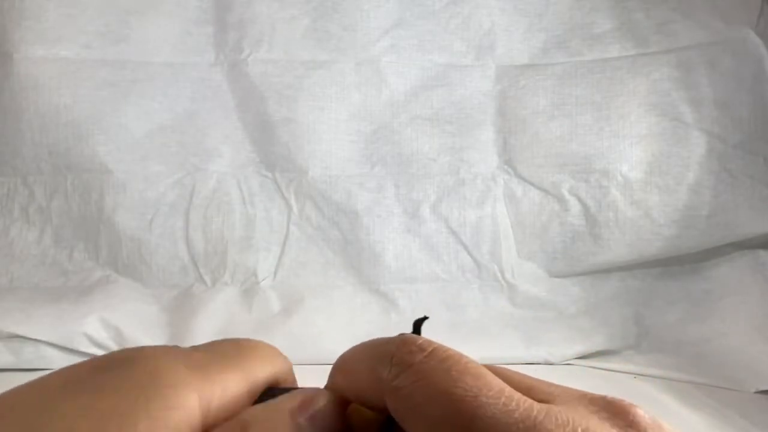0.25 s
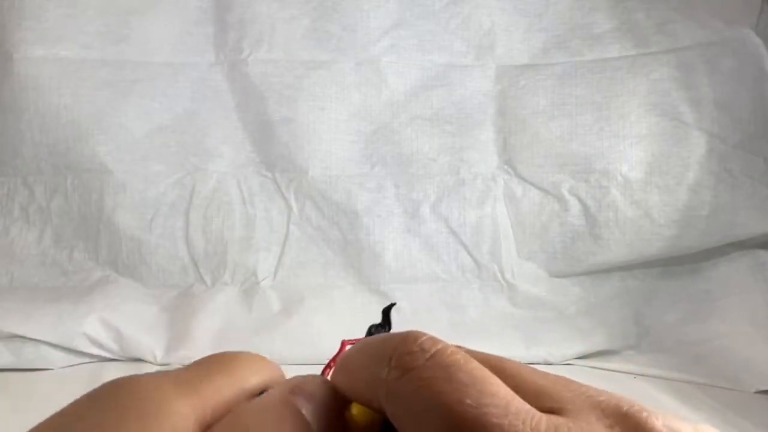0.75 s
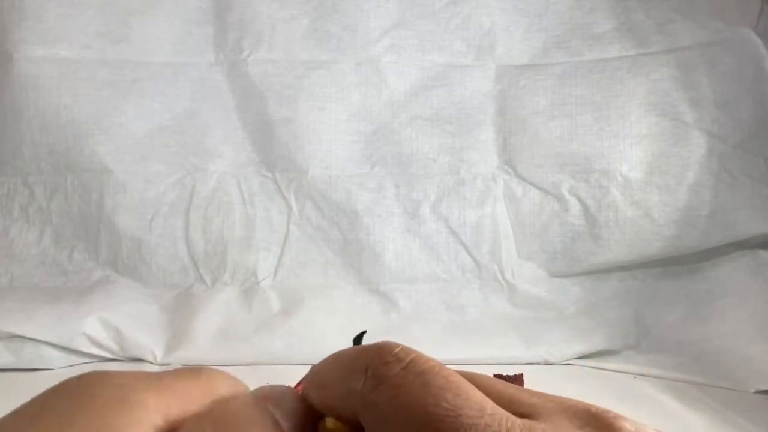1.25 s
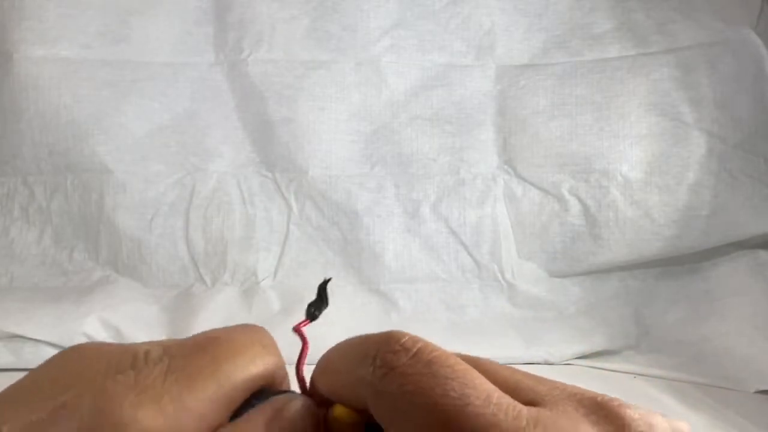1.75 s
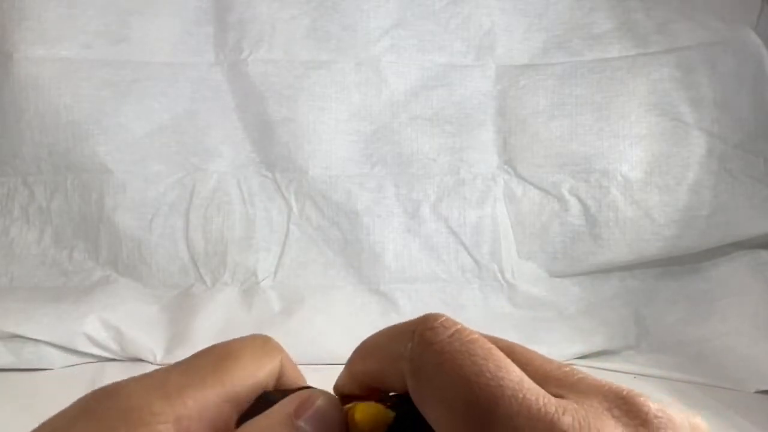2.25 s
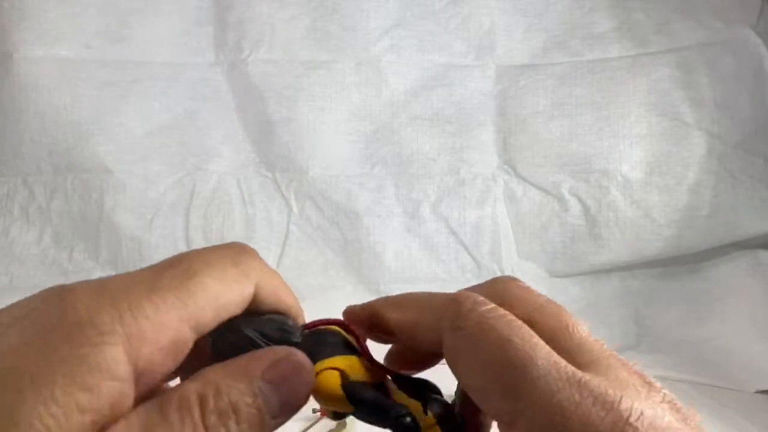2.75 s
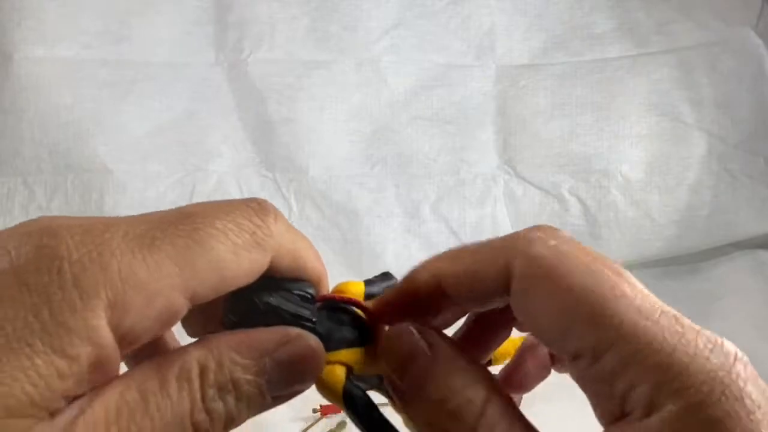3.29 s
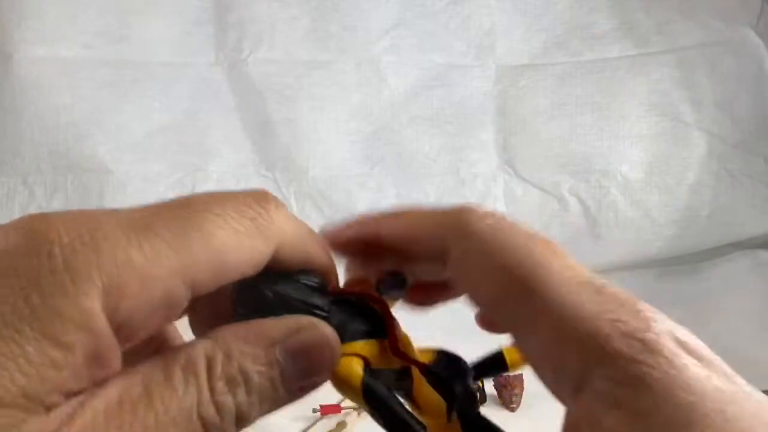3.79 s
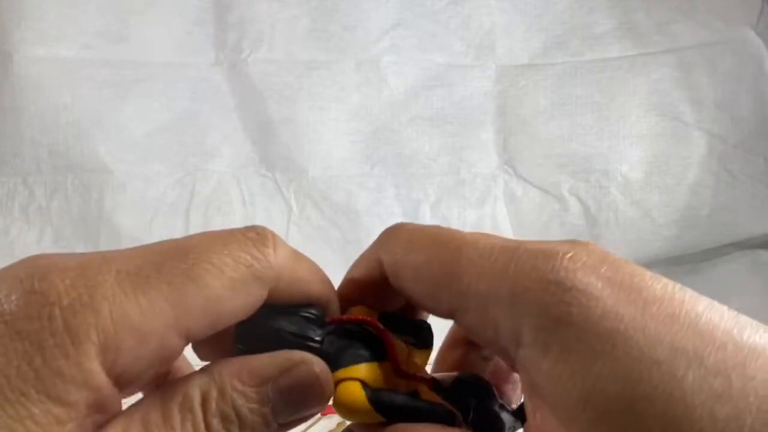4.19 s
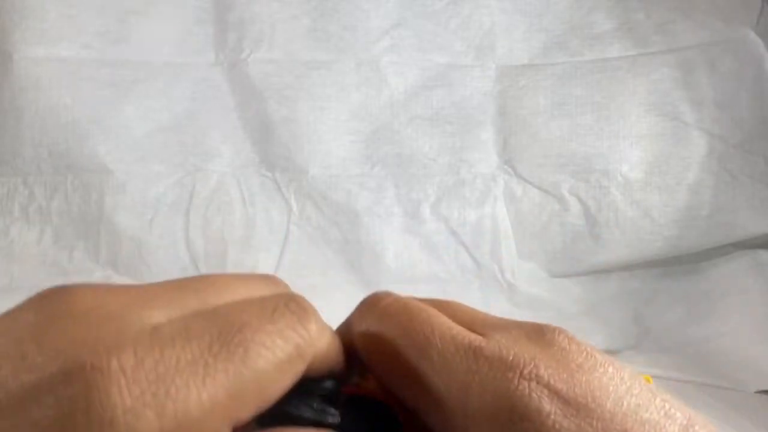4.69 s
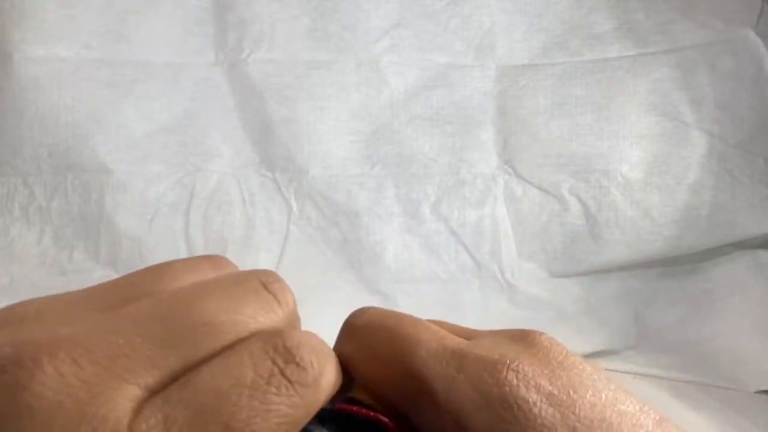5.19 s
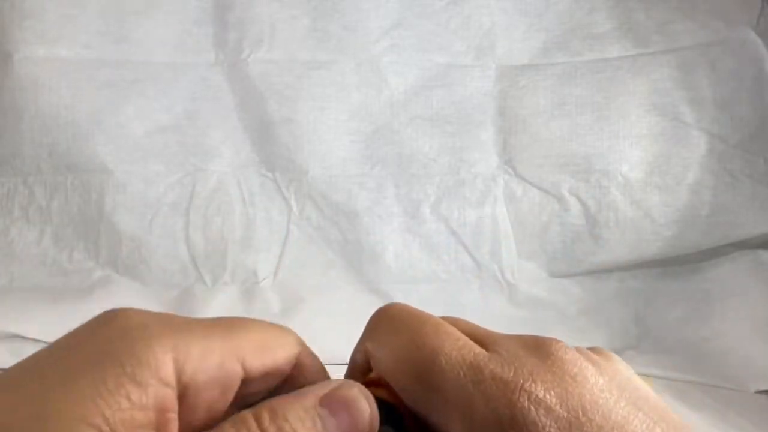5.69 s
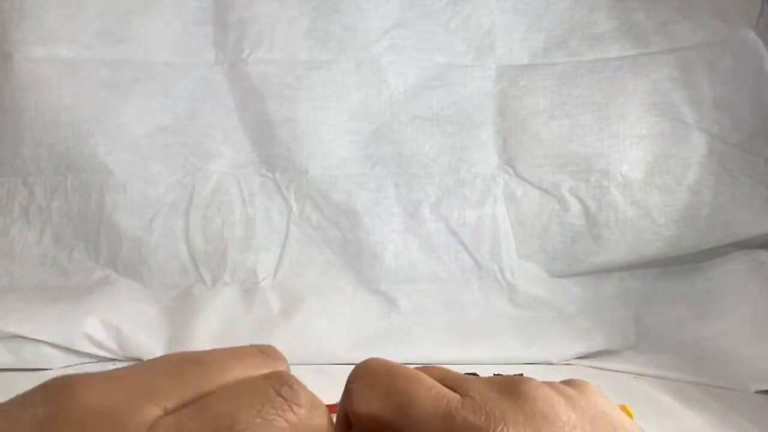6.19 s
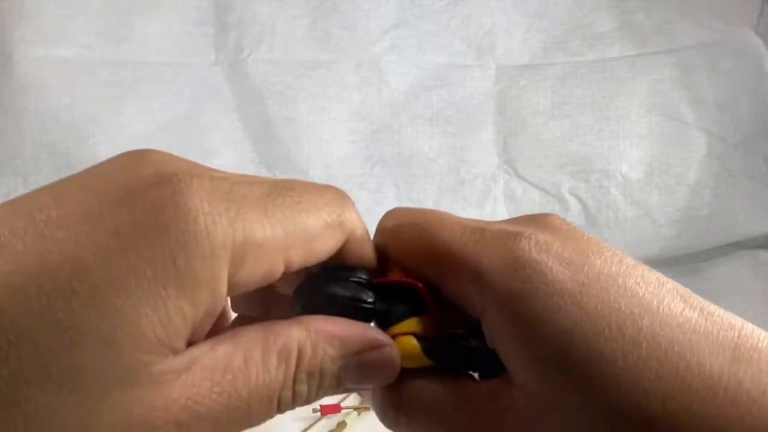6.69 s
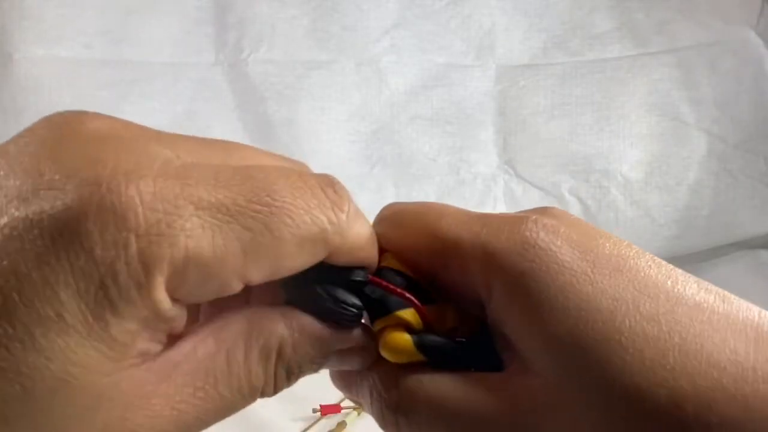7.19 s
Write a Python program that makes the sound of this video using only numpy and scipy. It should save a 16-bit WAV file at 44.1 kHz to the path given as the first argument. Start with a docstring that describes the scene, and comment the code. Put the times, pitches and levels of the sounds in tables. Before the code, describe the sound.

Crisp plastic snaps and faint creaking ticks from a toy figure's stiff joint, with soft skin rubs and a few dull knocks, over faint hiss.

```python
"""In a small soft room, two hands work a stiff joint of a plastic toy figure close to a microphone.
The joint snaps and ticks, each slip ringing the modes of the plastic; fingers rub and scrape over it,
their fine random slips driving the same kind of modes, heavily damped or singing in one part.
A low handling bump and a few duller knocks farther off ring a second set of modes.
Underneath lie steady air noise, a low rumble that swells and fades, and a faint hum."""
import sys
import numpy as np
from scipy import signal
from scipy.io import wavfile
from scipy.ndimage import uniform_filter1d

SR = 44100
rng = np.random.default_rng(int(sys.argv[2]) if len(sys.argv) > 2 else 0)


def file_out(sig):
    """Save sig as 16-bit WAV at sys.argv[1]."""
    # one column per channel
    cols = np.atleast_2d(sig).T
    # limit, then scale
    lim = np.clip(cols, -1, 1)
    pcm = np.round(lim * 32767).astype(np.int16)
    wavfile.write(sys.argv[1], SR, pcm)


N = 328545  # samples

# All levels stand ahead of the peak rounding and bass cut in record(); t60 is the time to decay by 60 dB.

# Shape of the air noise spectrum. Each row: frequency in Hz, relative level in dB.
AIR_SPECTRUM = [(18, -34.5), (30, -11), (70, 2), (118, 5.5), (298, 2.5), (1310, -8.5), (4900, -18),
                (6900, -18.5), (9230, -18), (14800, -24.5), (16500, -44)]
AIR_DB = -69.5  # rms
# Low rumble that swells and fades. Each row: time in seconds, rms level in dB.
MURMUR_LEVELS = [(0.0, -76), (4.941, -74.5), (6.02, -67.5), (6.47, -79.5), (7.45, -79.5)]
MURMUR_HZ, MURMUR_WIDTH_HZ = 332, 162
# Hum that comes and goes. Each row: time in seconds, rms level in dB.
HUM_LEVELS = [(0, -76), (2.4, -77.5), (2.55, -87.5), (2.75, -77), (3.4, -75), (3.6, -81.5), (5.2, -86.5),
              (5.8, -82.5), (7.2, -80.5), (7.45, -88)]
HUM_HZ = 58.5

# Modes of the figure in five groups, low to high. Each row: frequency in Hz, t60 in seconds of the
# freely ringing figure, relative level in dB.
THUMP_MODES = [(90, 0.039, -13), (169, 0.051, -17), (413, 0.019, -13), (693, 0.0067, 6), (998, 0.0053, 8)]
DULL_MODES = [(1970, 0.0029, -2.5), (2380, 0.0067, -7), (3100, 0.0055, -3), (3864, 0.0029, 6)]
HARD_MODES = [(4823, 0.0035, -0.5), (5775, 0.004, -0.6), (6870, 0.0025, -3)]
BRIGHT_MODES = [(8030, 0.0048, 0.028), (9000, 0.0049, 0.005), (9794, 0.0055, 0.016), (10440, .004, 0.016)]
TOP_MODES = [(11700, .003, 1), (12900, .003, 1), (14200, .003, 0), (15500, .003, -1)]
TOP_DB = -1  # top modes against the treble, in snaps

# Resting grip of the fingers. Each row: time in seconds, level of the hard modes in dB.
GRIP_LEVELS = [(0, -130), (.5, -88), (.6, -86), (1.1, -80.5), (1.65, -83), (2.0, -83), (2.6, -83.5),
               (3.65, -81), (4.1, -85.5), (4.7, -79), (5.17, -84.5), (5.5, -76.5), (6.06, -82), (6.7, -87),
               (7.0, -79.5), (7.3, -85), (7.45, -81.5)]
GRIP_DULL_DB, GRIP_BRIGHT_DB = 2, -1.2  # against the hard modes
# Finger strokes over the plastic. Each row: middle in seconds, half length in seconds, level of the
# hard modes at the middle in dB, then against it: duller modes in dB, brighter modes in dB.
FINGER_STROKES = [(0.106, 0.29, -69, 7, -1), (0.364, 0.064, -75, 8, -9), (0.878, 0.33, -71, 2.5, -1.5),
                  (1.204, 0.28, -71.5, 4, -6), (1.71, .03, -75, -3.5, -7), (1.803, 0.08, -75.5, 3, -1),
                  (2.24, 0.14, -75, -4.5, 0.5), (2.463, 0.11, -66.5, -10.5, -1.5),
                  (2.562, 0.071, -67, -10.5, -1), (2.694, 0.094, -68.5, -4, -6.5), (2.76, .04, -73, 4, 3),
                  (2.92, 0.099, -78, -3.5, 2.5), (2.813, 0.024, -66.5, 3.5, -3), (3.02, 0.026, -65, -4, -5),
                  (3.141, 0.047, -67.5, -4, -0.5), (3.249, 0.029, -62.5, -12.5, -1.5),
                  (3.375, 0.11, -68, -2, -4), (3.486, 0.03, -64.5, -4, 1), (3.582, 0.062, -72.5, -6, 1),
                  (3.8, 0.082, -69, -1, 1.5), (3.957, 0.17, -69.5, -1, 2), (4.071, 0.024, -64.5, -2, 0),
                  (4.235, 0.058, -64.5, -4.5, 0.5), (4.374, 0.047, -61, -6, -7),
                  (4.46, 0.094, -62, -5.5, -0.5), (4.63, 0.049, -76, -6, -7), (4.877, 0.1, -71, 1.5, -0.5),
                  (5.02, 0.11, -69.5, -14, -4), (5.289, 0.098, -73.5, 7, -2.7),
                  (5.497, .09, -72.5, -6, -10), (5.66, 0.076, -77, 1.5, -7.5),
                  (7.17, 0.1, -78, -11.5, -8.5), (5.868, 0.089, -67.5, -12, 1), (6.25, .14, -72, 1, 1.5),
                  (6.423, 0.076, -77, -6, -4.5), (6.833, 0.075, -75, -7, -6.5)]
STROKE_FALL_DB = 16  # how far a stroke has faded half a length from its middle
SLIPS_PER_S, SLIP_SPREAD_DB = 14000, 3  # mean rate, scale of the exponential spread

# Snaps of the joint. Each row: start in seconds, peak in dB, pitch in Hz of the part that lets go, then
# against that part: thump, dull, hard and treble modes in dB; last, the room in dB before ROOM_DB is
# added, less when the hands cup the figure.
JOINT_SNAPS = [(0.042, -38.5, 2740, -19, -10, -6, -20, 7),
               (0.0994, -14.5, 5540, -22.5, -6.5, -4.5, -11, -2),
               (0.1377, -13.5, 5540, -23, -8, -7, -13, -2.5), (0.1563, -17.5, 2660, -36, -11, -3, 2, -6),
               (0.2309, -31.5, 3650, -21, 1, -11, 5.5, -3), (0.2498, -42.5, 3660, -15, -3, -2.5, -11, 5),
               (0.2689, -38.5, 3750, -7.5, -11, -3, -16, -6), (0.3277, -26, 3720, -33, 5.5, 8, 5.5, -1),
               (0.341, -32, 3850, -22, -3, -1, -19, -13), (0.3498, -38, 3810, -20, 2, -1.5, -26, 6),
               (0.3765, -32, 4080, -28, 4, 0, -3, -9), (0.3876, -32, 6650, -41, -12, -12, -17, 0),
               (0.3937, -28, 3350, -39, -1, -3, -8, -4), (0.436, -40, 6460, -8, 0, -9, -11, 0),
               (0.4432, -14.5, 7000, -49, -1, 4.5, 1, -9), (0.447, -19, 6200, -49, -11, -4, -10.5, 0),
               (0.4601, -29.5, 4150, -26, 5, 1, -3, -13), (0.5212, -47, 2260, -5, -8, -13, -13, 7),
               (0.5282, -41.5, 6350, -8.5, -7, -9, -9, -9), (0.9046, -4, 3530, -23, -20, -5.5, -22, -5.5),
               (0.992, -24.5, 5840, -34, -10, -13, -8.5, -0.5),
               (1.0197, -28, 3590, -22, -18, -3.5, -18, -9), (1.0849, -33, 3600, -18, -1, -8, -39, -15),
               (1.1239, -42.5, 3600, -12, 0, -6, -17, 8), (1.204, -18.5, 6050, -45, -6, -7, -4, 1),
               (1.222, -15.5, 5680, -24, -7.5, -4, -9, -1.5), (1.2255, -16.5, 2740, -28, -0.5, -9, 5.5, -9),
               (1.282, -47, 3750, -18, 5, -16, -14, -9), (1.2915, -25.5, 2700, -27, -2, -7, -2, -2),
               (1.2963, -32.5, 3460, -15, 1, -9, -3, -13), (1.3027, -12, 5470, -24, -8.5, -4, -9, -0.5),
               (1.4126, -40, 3750, -29, -27, -25, -31, -3), (1.4426, -16, 6840, -49, -9, -4.5, -4, -5.5),
               (1.4516, -50, 6520, -19, -1.5, -5, -6, 5), (1.4871, -20, 4000, -41, -5, 2, 0, -2.5),
               (1.5671, -17, 6540, -47, -3.5, 7.5, 2.5, 0.5), (1.5748, -36.5, 4880, -19, -4, -16, -20, 6),
               (1.58, -37.5, 5060, -20, -8, -1, -20, 0), (1.653, -47, 2430, -5, -4, -2.5, -3, 0),
               (1.7374, -32, 2680, -29.5, -6, -4, 0.5, -7.5), (1.846, -22.5, 6100, -38, -13.5, -5, -7, -2),
               (1.88, -34.5, 5930, -40, -13.5, -4, -14, 3.5), (1.9029, -32, 4130, -36.5, -19, -7, -14, -3),
               (1.9794, -23, 5400, -41, -6, -7, -17, -1.5), (2.0281, -32, 5570, -18, -15, -5, -7, -1),
               (2.0398, -26.5, 5250, -4, -2.5, -9, -13, 0), (2.0945, -42.5, 4050, 6, -12, -8, 5, 10),
               (2.174, -23, 2860, -18, -1.5, -4, -11, -4), (2.324, -50, 5340, -9.5, -9, -7, 0.5, 0),
               (2.442, -18, 5200, -48, -9, -14, -15, -8), (2.5585, -26.5, 5000, -27.5, 5.5, 14, 2, -9),
               (2.7502, -43, 4840, -9.5, -5, -4, -17, 10), (3.0558, -33, 5860, -23, -5.5, 0.5, -8, 2),
               (3.2524, -26, 5250, -23.5, -4, -0.5, -12.5, -7),
               (3.322, -20.5, 4450, -49, -10.5, -5.5, -16, -4.5), (3.9207, -32, 5000, -11, -4, 4, -2.5, -9),
               (3.9532, -40.5, 6200, -19, -5, -7, -5, -8), (3.9847, -35, 3980, -20, -4, -5, -9, 2),
               (4.0803, -40.5, 3700, -14, -2, -6, -13, -3), (4.8622, -43.5, 5400, -26, -16, -13, -11, -4),
               (4.992, -44.5, 5430, -25, -10, -5.5, -9, 14), (5.4, -48.5, 4210, 12, -10, -9, -22, 4),
               (5.4393, -29, 6030, -37, 1, 0.5, 0, -6), (5.5397, -19.5, 5200, -41, -11, -23, -18, 6.5),
               (5.5448, -5, 5050, -51, -17, -4, -15.5, -9), (5.5646, 1, 3460, -17, -6, -3, -14, -3),
               (5.614, -28.5, 2950, -31, -8, 2, -13, 1), (5.7988, -33, 6070, -31, -5, -11, -12, -1.5),
               (5.836, -8.5, 5570, -30, -8, 10, -6.5, -4.5), (5.8533, -35, 5710, -33, -14, -7, -11, -2),
               (5.874, -23, 3630, -10.5, -11.5, -12, -32, 0.5), (5.8824, -33, 3200, -34, -20, -5, -21, -10),
               (5.8947, -31.5, 5500, -32, -17, 0, -25, -8), (5.9151, -33, 4910, -5, -4, -1, -12, -6),
               (5.945, -44, 3980, -21, -9, -4, -16, 16.5), (5.9853, -39, 4560, -9.5, -1.5, -5, -14, -3),
               (5.9891, -34.5, 2900, -6.5, -10, -3, -10.5, 2.5),
               (6.3119, -24.5, 3520, -31, -27, -2, -14.5, -5.5),
               (7.0514, -14, 4804, -46, -11.5, -5.5, -22, -8), (7.0931, -36, 3200, -15, -11, 1, -8, 7),
               (7.1019, -6.5, 4430, -19.5, -6.5, -11.5, -19.5, -3),
               (7.3715, -22, 4740, -26, 0, 1.5, -11.5, -4), (7.431, -35, 4600, -17, -3.5, -5.5, -31, -6)]
PART_T60 = 0.0051  # seconds
# Runs of faint ticks while the joint creeps. Each row: start in seconds, end in seconds,
# mean peak in dB, central pitch in Hz.
CREEP_RUNS = [(0.205, 0.318, -45, 3730), (0.356, 0.531, -46, 3360), (0.991, 1.129, -48, 3500),
              (1.461, 1.531, -47, 3540), (1.702, 1.791, -50, 3540), (4.838, 5.0, -47, 5340),
              (5.357, 5.448, -51, 4400), (5.451, 5.536, -49, 5370), (5.733, 5.955, -50.5, 4140)]
TICKS_PER_RUN = 4
TICK_SPREAD_DB, TICK_SCATTER = 9, 0.18  # full range of strengths; share of the pitch, either way
# One row shared by all ticks, as in the last columns of the snaps: thump, dull, hard, treble, room, in dB.
TICK_BALANCE = (-12, -6, -7.5, -15, -1.5)

# Single reflections. Each row: delay in seconds, level in dB.
REFLECTIONS = [(.0022, -20), (.0047, -25.5), (.009, -28.5), (0.0098, -33)]
# Reverberation time by band. Each row: frequency in Hz, t60 in seconds.
ROOM_DECAY = [(150, 0.087), (600, 0.07), (2000, 0.13), (4500, .16), (9000, .13), (15000, 0.12)]
# Shape of the reverberant spectrum. Each row: frequency in Hz, relative level in dB.
ROOM_SPECTRUM = [(150, -4), (600, 9), (2000, -0.7), (4500, -4), (9000, -4), (15000, -3.5)]
ROOM_DB = -4.5  # added to the room column of every snap and tick

# Scrapes that sing in one part of the figure. Each row: start in seconds, end in seconds,
# frequency in Hz, rms level before the fades in dB.
SINGING_SCRAPES = [(0.651, 0.805, 2300, -74), (2.316, 2.618, 5270, -75), (2.47, 2.57, 12000, -73),
                   (2.653, 2.76, 9600, -73), (2.661, 2.76, 3500, -73.5), (2.78, 2.831, 5860, -71),
                   (2.995, 3.04, 13600, -73.5), (2.993, 3.04, 8500, -68.5), (3.069, 3.158, 4550, -67),
                   (3.16, 3.245, 4660, -77), (3.747, 3.91, 3120, -73), (4.343, 4.524, 5830, -68.5),
                   (4.826, 5.105, 5230, -75.5), (4.97, 5.118, 3060, -74), (5.227, 5.367, 3040, -75),
                   (5.243, 5.357, 5500, -79), (6.332, 6.45, 4940, -79.5), (6.789, 6.979, 4700, -76)]
SCRAPE_T60 = .004  # seconds

# Dull knocks and one low bump, the first row. Each row: start in seconds, peak in dB, hardness as the
# frequency in Hz above which the blow fades, weight on the deepest modes in dB, room in dB.
BUMP_AND_KNOCKS = [(1.189, -55, 148.2, 23, 3.5), (1.9967, -22, 1410, -14, 2), (2.011, -28, 1320, 16, 3),
                   (2.1049, -19.5, 3040, -14, 4.5), (2.133, -35.5, 3470, -6, 12.5)]
# Modes rung by the bump and the knocks. Each row: frequency in Hz, t60 in seconds, level in dB before
# the softness and weight of the blow.
KNOCKED_MODES = [(88.5, 0.066, -13), (131, 0.12, -20), (240, 0.053, -5), (492, 0.071, -8),
                 (845, 0.015, 7.5), (1092, 0.0054, 21), (1530, 0.013, 7), (2440, 0.0037, 20.5),
                 (3430, 0.01, 8), (4050, 0.0025, 17)]

CEILING = .88  # amplitude that the rounded peaks approach
LOW_CUT_HZ, EDGE_HZ = 56.6, 16800  # bass cut, upper band limit


def gain_of(db):
    """A level in decibels is twenty times the logarithm of this amplitude factor."""
    return 10 ** (np.asarray(db) / 20)


def evened(x):
    """Division by the root mean square gives a signal unit power."""
    return x / np.sqrt(np.mean(x ** 2) + 1e-20)


def read(points, hz):
    """A spectral curve is interpolated linearly along a logarithmic frequency axis."""
    f, value = np.transpose(points)
    return np.interp(np.log(hz + 1), np.log(f + 1), value)


def add(mix, s, sound):
    """Superposition: pressures add, here from time s on."""
    part = mix[round(s * SR):][:len(sound)]
    part += sound[:len(part)]


def level_over_time(points):
    """A level in dB moves linearly between tabulated times; its amplitude factor is returned."""
    return gain_of(np.interp(np.arange(N) / SR, *np.transpose(points)))


def air():
    """Stationary noise: random complex spectra under a fixed curve, with slightly drifting patches."""
    frames, hz = N // 256 + 5, np.fft.rfftfreq(1024, 1 / SR)
    real, imaginary, patches = rng.standard_normal((frames, 513, 3)).T
    patches = uniform_filter1d(patches, size=10, axis=0)  # smooth over frequency
    patches = evened(uniform_filter1d(patches, size=14, axis=1))  # smooth over time
    curve_db = read(AIR_SPECTRUM, hz)[:, None] + 1.3 * patches
    spectra = (real + 1j * imaginary) * gain_of(curve_db)
    noise = signal.istft(spectra, nperseg=1024, noverlap=768)[1][:N]
    return gain_of(AIR_DB) * evened(noise)


def murmur():
    """Band-pass filtering of white noise leaves a low rumble, whose level swells and fades."""
    edges = [MURMUR_HZ - MURMUR_WIDTH_HZ / 2, MURMUR_HZ + MURMUR_WIDTH_HZ / 2]
    band = signal.butter(2, edges, "band", fs=SR, output="sos")
    rumble = evened(signal.sosfilt(band, rng.standard_normal(N)))
    return rumble * level_over_time(MURMUR_LEVELS)


def hum():
    """Amplitude modulation: a single low sinusoid comes and goes."""
    t = np.arange(N) / SR
    return np.sqrt(2) * level_over_time(HUM_LEVELS) * np.sin(2 * np.pi * HUM_HZ * t)


def ring(modes, luck, rise, detune=0, uneven_db=0):
    """Modal superposition: damped sinusoids, one per row, whose pitch, strength and phase vary by contact."""
    hz, t60, db = (column[:, None] for column in np.transpose(modes))
    pitch_luck, level_luck, phase = luck[:, :len(modes), None]
    t = np.arange(2048) / SR
    build_up = 1 - np.exp(-t * hz / rise)  # rise is in cycles of the mode
    swell = build_up * np.cos(np.pi / 2 * t / t[-1])  # ends at zero
    shifted_hz = hz * (1 + detune * (pitch_luck - .5))
    tone = np.sin(2 * np.pi * (shifted_hz * t + phase * (hz > 1400)))  # low modes all start at phase zero
    level_db = db + uneven_db * (level_luck - .5) - 60 * t / t60
    return gain_of(level_db) * swell * tone


def pressure():
    """Powers of grip and strokes add; returned are the amplitudes driving dull, hard and bright modes."""
    t = np.arange(0, N, 32) / SR
    grip_balance_db = np.array([[GRIP_DULL_DB], [0], [GRIP_BRIGHT_DB]])
    power = gain_of(np.interp(t, *np.transpose(GRIP_LEVELS)) + grip_balance_db) ** 2
    for middle, half, db, dull_db, bright_db in FINGER_STROKES:
        fall_db = STROKE_FALL_DB * np.abs((t - middle) / half) ** 1.2
        balance_db = np.array([[dull_db], [0], [bright_db]])
        power = power + gain_of(db - fall_db + balance_db) ** 2
    return [np.interp(np.arange(N) / SR, t, np.sqrt(row)) for row in power]


def rubbing():
    """Frictional excitation: thousands of tiny skin slips a second shake the hand-damped figure."""
    out = np.zeros(N)
    strengths = gain_of(SLIP_SPREAD_DB * np.minimum(rng.exponential(1, N), 5))
    slips = strengths * (rng.random(N) < SLIPS_PER_S / SR)
    groups = DULL_MODES, HARD_MODES, BRIGHT_MODES + TOP_MODES
    for group, level in zip(groups, pressure()):
        damped_modes = [(f, 0.16 * t60, db) for f, t60, db in group]  # the hand shortens the decay
        damped = ring(damped_modes, np.zeros((3, 8)), rise=1.0)[:, :256]
        shaken = np.zeros(N)
        for mode, (_, _, db) in zip(damped, group):
            force = slips * rng.standard_normal(N)  # slips at many points: random forces for every mode
            shaken += signal.oaconvolve(force, evened(mode))[:N] * gain_of(db)
        out += level * evened(shaken)
    return out


def power_sum(rows):
    """Minimum phase: one causal pulse whose power spectrum is the sum of those of the rows."""
    log_gain = np.log(np.sum(np.abs(np.fft.fft(rows)) ** 2, 0) + 1e-12) / 2
    return np.fft.ifft(np.exp(np.conj(signal.hilbert(log_gain)))).real


def blows(events):
    """Impact excitation: every blow rings its modes into a direct signal and a signal for the room."""
    near, far = np.zeros((2, N))
    for s, db, wet_db, modes, luck, rise in events:
        sound = ring(modes, luck, rise, detune=.06, uneven_db=4.).sum(0)
        size = gain_of(db) / np.abs(sound).max()
        add(near, s, size * sound)
        # the walls get every mode from another side: blurred, the first slightly stronger, adding in power
        blurred_modes = [(f, 0.3 * t60, level) for f, t60, level in modes]
        blurred = ring(blurred_modes, luck, rise)
        blurred[0] *= gain_of(0.5)
        add(far, s, size * gain_of(wet_db) * power_sum(blurred))
    return near, far


def snaps():
    """Stick-slip release: each slip rings the part that lets go and, more or less, the whole figure."""
    events, slips = [], JOINT_SNAPS + ticks()
    lucks = rng.random((len(slips), 3, 24))
    for (s, db, hz, thump, dull, hard, treble, wet_db), luck in zip(slips, lucks):
        lifted_groups = [(THUMP_MODES, thump), (DULL_MODES, dull), (HARD_MODES, hard),
                         (BRIGHT_MODES, treble), (TOP_MODES, treble + TOP_DB)]
        modes = [(hz, PART_T60, 0)]
        for group, lift in lifted_groups:
            modes += [(f, t60, level + lift) for f, t60, level in group]
        luck[:2, 0] = 1 / 2  # the part itself keeps its pitch and strength
        events.append((s, db, wet_db + ROOM_DB, modes, luck, .8))
    return blows(events)


def ticks():
    """Creep: weak slips at random moments of each run, as rows like those of the snaps."""
    rows = []
    lucks = rng.random((len(CREEP_RUNS), TICKS_PER_RUN, 3))
    for (start, end, db, hz), run in zip(CREEP_RUNS, lucks):
        for when, size, tone in run:
            moment = start + (end - start) * when
            peak_db = db + TICK_SPREAD_DB * (size - .5)
            pitch_hz = hz * (1 + TICK_SCATTER * (2 * tone - 1))
            rows.append((moment, peak_db, pitch_hz, *TICK_BALANCE))
    return rows


def echoes(x):
    """Specular reflection: delayed, weaker copies from the sheet, the hands and the nearest wall."""
    out = np.zeros(N)
    for delay, db in REFLECTIONS:
        add(out, delay, gain_of(db) * x)
    return out


def room(x):
    """Reverberation: sparse taps of random sign die away at a rate set by frequency."""
    size, out, t = SR // 3, np.zeros(N), np.arange(N) / SR
    for k in range(3):  # three tails in turn keep like hits from sounding alike
        taps = np.zeros(size)
        at = np.arange(90, size - 10, 10)
        taps[at + rng.integers(0, 10, len(at))] = rng.choice([-1., 1.], len(at))
        taps[:330] *= gain_of(-4.0)  # weaker until the walls answer
        hz, lag, z = signal.stft(taps, SR, nperseg=128)
        decay_db = 60 * lag / read(ROOM_DECAY, hz)[:, None]
        z *= gain_of(read(ROOM_SPECTRUM, hz)[:, None] - decay_db)
        tail = signal.istft(z, SR, nperseg=128)[1]
        turn = np.sqrt(2 / 3) * np.cos(2 * np.pi * (3.1 * t + k / 3))  # squares of the three sum to one
        out += signal.fftconvolve(x * turn, tail / np.linalg.norm(tail))[:N]
    return out


def scrapes():
    """Resonance under friction: a dragged fingertip or edge slips finely, keeping one mode sounding."""
    out = np.zeros(N)
    for start, end, hz, db in SINGING_SCRAPES:
        size = round((end - start) * SR)
        noise = rng.standard_normal(N // 10)[:size]
        wander = evened(uniform_filter1d(rng.standard_normal(N // 10), size=500))[:size]
        slips = noise * gain_of(2.9 * wander)  # strength wanders by a few dB
        mode = ring([(hz, SCRAPE_T60, 0)], np.zeros((3, 1)), rise=1.0)[0]
        singing = evened(signal.fftconvolve(slips, mode)[:size])
        add(out, start, gain_of(db) * singing * signal.windows.tukey(size, .4))
    return out


def bump_and_knocks():
    """Contact time: the softer a blow, the longer its contact and the more it mutes the upper modes."""
    events = []
    lucks = rng.random((len(BUMP_AND_KNOCKS), 3, 12))
    for (s, db, hard_hz, weight_db, wet_db), luck in zip(BUMP_AND_KNOCKS, lucks):
        modes = []
        for f, t60, level in KNOCKED_MODES:
            softness_db = 10 * np.log10(1 + (f / hard_hz) ** 4)
            modes.append((f, t60, level - softness_db + weight_db * (f < 200)))
        events.append((s, db, wet_db, modes, luck, .7))
    return blows(events)


def scene():
    """Superposition of direct sounds, the echoes and reverberation of the blows, and the background."""
    (snap, snap_far), (knock, knock_far) = snaps(), bump_and_knocks()
    struck = snap + knock
    reflected = echoes(struck) + room(snap_far + knock_far)
    background = air() + murmur() + hum()
    return (struck + reflected + rubbing() + scrapes() + background)[None]


def record(dry):
    """Saturation rounds the highest peaks; a steep bass cut delays the deepest notes; a band limit follows."""
    rounded = dry / (1 + (dry / CEILING) ** 4) ** (1 / 4)
    bass_cut = signal.butter(5, LOW_CUT_HZ, "high", fs=SR, output="sos")
    cut = signal.sosfilt(bass_cut, rounded)
    band_limit = signal.firwin(255, EDGE_HZ, window=("kaiser", 9), fs=SR)
    return signal.oaconvolve(cut, band_limit[None], "same")


dry = scene()
out = record(dry)
file_out(out)
```